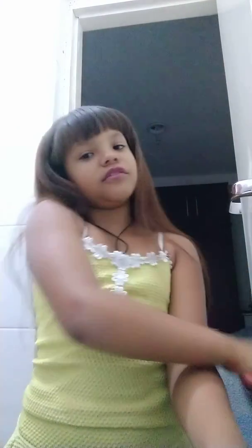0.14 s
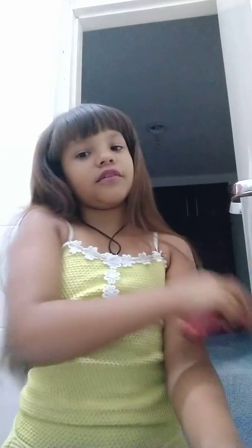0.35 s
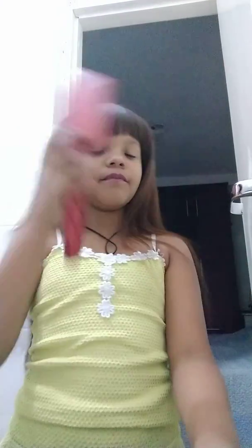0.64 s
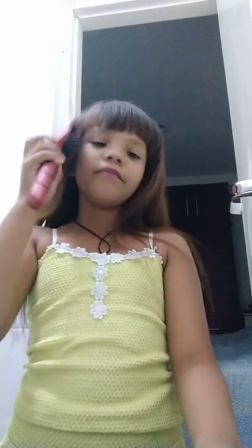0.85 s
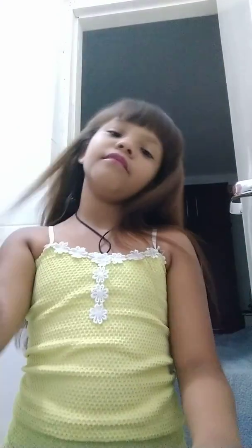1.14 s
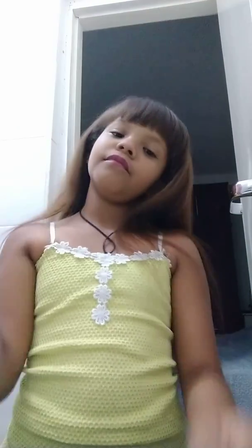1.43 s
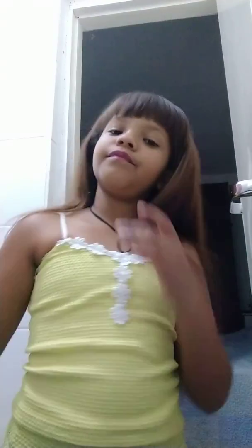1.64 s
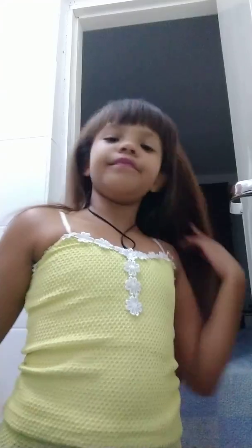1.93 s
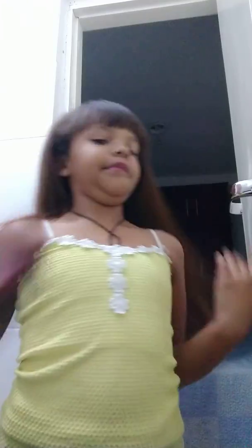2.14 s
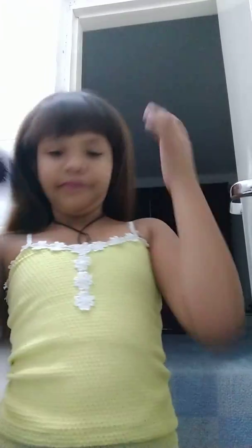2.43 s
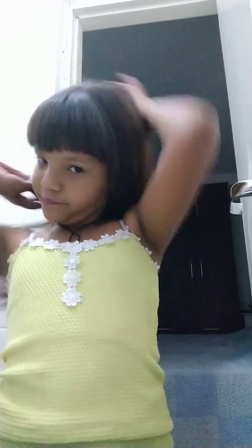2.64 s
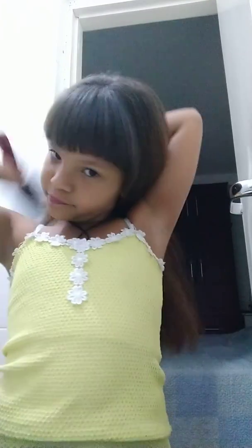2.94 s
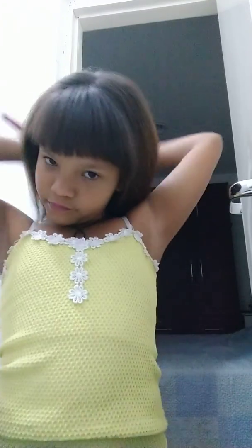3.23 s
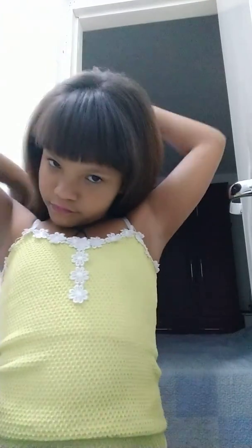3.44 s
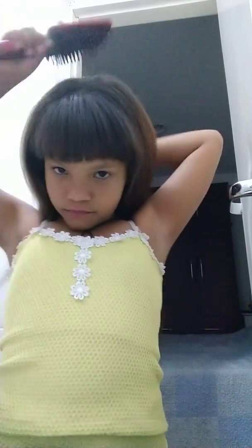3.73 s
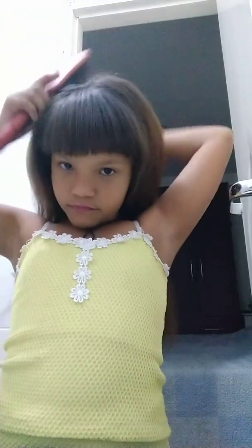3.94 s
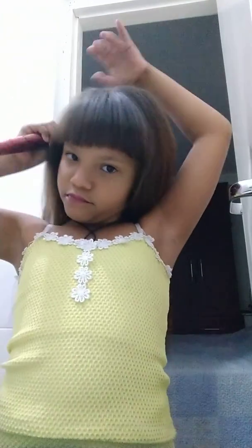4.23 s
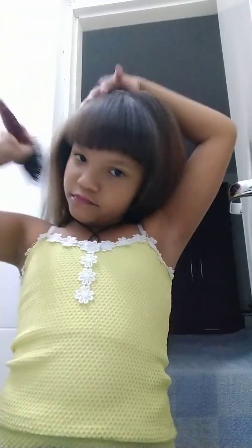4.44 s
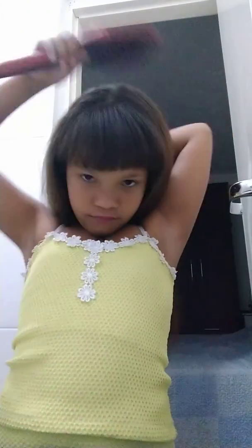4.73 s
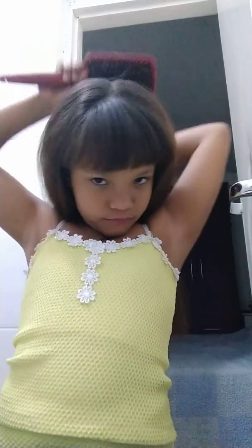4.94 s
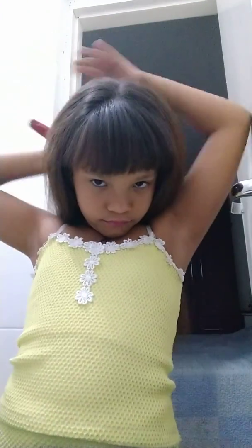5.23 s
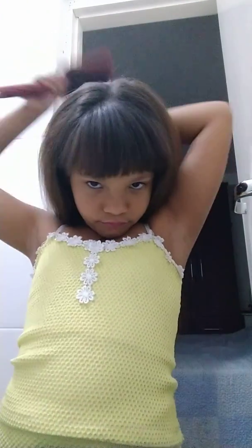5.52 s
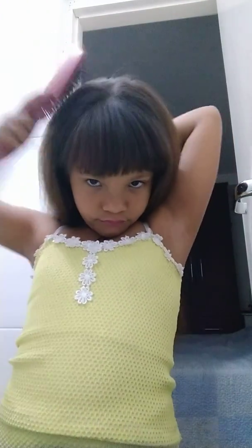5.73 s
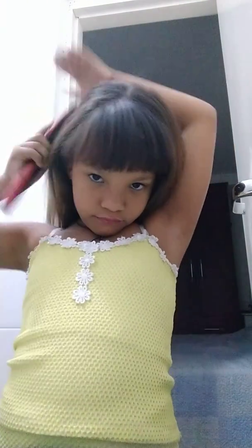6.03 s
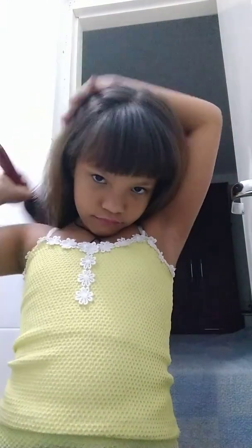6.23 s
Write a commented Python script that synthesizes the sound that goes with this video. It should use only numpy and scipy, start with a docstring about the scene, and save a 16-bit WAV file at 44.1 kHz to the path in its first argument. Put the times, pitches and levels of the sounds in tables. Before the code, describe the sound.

Close stereo microphones in a small tiled room with a quiet low murmur and slight hiss. At about 0.1 s there is a faint tick and soft bump; at 0.24 s a hard knock with a click, and at 0.58 s a much louder, cracking knock that clips, rings woodenly and leaves the level ducked. A tiny high squeak at 0.86 s precedes brush strokes at 1.1 to 1.2 s, swishy and scratchy, then fainter sliding hair and a tick around 1.5 to 1.6 s. Strokes grow from 2.4 to 2.8 s. Small snags lead to a heavy thud at 3.47 s, starting a deep, hollow, ringing drumming with strong swishes to 3.8 s, fading over about a second. Ticks and strokes follow at 3.9 to 4.4 s. At 5.0 s thin squeaks, at 5.25 s a firm stroke with a low thump, then soft fading rustle to 6.3 s.

```python
"""A quiet room murmur comes first, with a faint tick and a soft bump, then two hard knocks of a hairbrush.
Long hair is brushed in a small tiled room, close to a pair of microphone ports; the second knock
overloads the recorder and ducks its gain. Pins tick (short noise bursts), pluck the hair and drum on the
hollow cushion, while strands swish and hiss (filtered random clicks, densest in the hiss); pulls swell and fade.
Midway a deep, ringing drumming (narrow resonances) sets in at once and dies away over a second."""
import sys
import numpy as np
from scipy import signal
from scipy.fft import rfft, irfft, next_fast_len
from scipy.io import wavfile
from scipy.ndimage import uniform_filter1d

SR = 44100
rng = np.random.default_rng(int(sys.argv[2]) if len(sys.argv) > 2 else 0)


def generate_wav(signal):
    """Clip the signal to [-1, 1] and save it as 16-bit WAV at the path in sys.argv[1]."""
    frames = np.transpose(np.atleast_2d(signal))
    scaled = np.clip(frames, -1, 1) * 32767
    pcm = np.round(scaled).astype(np.int16)
    wavfile.write(sys.argv[1], SR, pcm)


N = 280668
TIME = np.arange(N) / SR
SIZE = next_fast_len(N + SR)  # room for a one-second tail
FREQS = np.maximum(np.fft.rfftfreq(SIZE, 1 / SR), 1)
LEFT_RIGHT = np.array([[1], [-1]])


def from_db(db):
    """Decibels to gain."""
    return 10 ** (np.asarray(db) / 20)


def rms_one(x):
    """Scale to an rms of 1."""
    return x / np.sqrt(np.mean(x ** 2) + 1e-20)


def at_hz(points, hz):
    """Read a table between its points, on a log-frequency axis."""
    knots, values = np.transpose(points)
    return np.interp(np.log(hz), np.log(knots), values)


def colour(x, spectrum):
    """Filter to a spectrum without sounding ahead of the input; white noise keeps its power."""
    gain = rms_one(from_db(at_hz(spectrum, FREQS)))
    cepstrum = irfft(np.log(gain), SIZE)
    # folding the cepstrum forward in time makes the filter minimum-phase
    cepstrum[1:SIZE // 2] *= 2
    cepstrum[SIZE // 2 + 1:] = 0
    return irfft(rfft(x, SIZE) * np.exp(rfft(cepstrum)), SIZE)[..., :N]


def low_cut(x, hz):
    """Remove what lies below a frequency."""
    return signal.sosfilt(signal.butter(2, hz, "high", fs=SR, output="sos"), x)


def drift(rate_hz):
    """Slow random wandering with spread 1, computed at every 40th sample."""
    r = np.exp(-80 * np.pi * rate_hz / SR)
    noise = rng.standard_normal(N // 40 + 2002)
    slow = signal.lfilter([1], [1, -2 * r, r * r], noise)[2000:]  # drop the settling time
    return np.interp(np.arange(N) / 40, np.arange(len(slow)), rms_one(slow))


def grains(per_s, spread_db):
    """Two trains of random clicks of uneven size and sign; rms 1."""
    sizes = from_db(spread_db * np.minimum(rng.exponential(1, (2, N)), 4))
    signed = sizes * rng.choice([-1, 1], (2, N))
    return rms_one(signed * (rng.random((2, N)) < per_s / SR))


def impulses(times, db):
    """One click per event."""
    out = np.zeros(N)
    out[np.round(np.asarray(times) * SR).astype(int)] = from_db(db)
    return out


def fade(start, length):
    """Sudden start, then exponential decay."""
    age = TIME - start
    return (age >= 0) * np.exp(-np.clip(age / length, 0, 60))


def swell(s, rise, hold, fall, swell_db=20):
    """Gain of one movement: it climbs 20 dB over its rise, holds around its middle, sinks 20 dB over its fall."""
    age = TIME - s
    outside_hold = np.maximum(abs(age) - hold / 2, 0)
    return from_db(-swell_db * outside_hold / np.where(age < 0, rise, fall))


def even(x, window_s):
    """Hold the level of a noise steady over the window; its faster flutter stays."""
    power = uniform_filter1d(np.mean(x ** 2, axis=0), size=max(int(window_s * SR), 1))
    return x / np.sqrt(np.maximum(power, 1e-12))


def ring(clicks, hz, t60):
    """A unit click sets a sine of height 1 ringing; it falls 60 dB in t60 seconds."""
    r, w = np.exp(-np.log(1000) / (t60 * SR)), 2 * np.pi * hz / SR
    return signal.lfilter([0, np.sin(w)], [1, -2 * r * np.cos(w), r * r], clicks + 1e-18)


def resonances(x, table):
    """Parallel resonances, each at its own level; the narrower, the longer it rings."""
    out = []
    for hz, width_hz, db in table:
        t60 = np.log(1000) / (np.pi * abs(width_hz))
        out.append(from_db(db) * rms_one(ring(x, hz, t60)))
    return out


# resonances of the brush and the room around it: pitch_hz, width_hz, boost_db
BRUSH_BODY = [(119, 390, 2.5), (191.3, 13, 7.5), (248, 31, 5.5), (315.6, 3.2, 11.5), (416, 26, 7),
              (585, 100, -6.5), (604.2, 16, 12.5), (660, 57, 1), (975, 14, 6.5)]


def body(x):
    """A chain of resonant peaks and dips."""
    for hz, width_hz, db in BRUSH_BODY:
        gain, half = from_db(db / 2), np.pi * width_hz / SR
        c = -2 * np.cos(2 * np.pi * hz / SR)
        x = signal.lfilter([1 + half * gain, c, 1 - half * gain],
                           [1 + half / gain, c, 1 - half / gain], x)
    return x


# how long the room takes to fall silent by 60 dB: pitch_hz, t60_s
ROOM_DECAY = [(80, 0.65), (170, 0.66), (400, 0.55), (800, 0.36), (1500, 0.29), (14000, 0.22)]


def room(x):
    """Diffuse one-second tail, two unrelated draws; each band of noise dies at its own rate."""
    edges = np.r_[0, 60 * 2 ** np.arange(9), SR]
    white, hz, tail = rfft(rng.standard_normal((2, SR))), np.arange(SR // 2 + 1), 0
    for low, high in zip(edges, edges[1:]):
        band = irfft(white * ((hz >= low) & (hz < high)), SR)
        t60 = at_hz(ROOM_DECAY, (low + high) / 2)
        tail = tail + band * np.exp(-np.log(1000) * TIME[:SR] / t60)
    return signal.fftconvolve(np.atleast_2d(x), tail, axes=1)[:, :N]


# how alike the two ports hear: pitch_hz, likeness (1 same, 0 unrelated, -1 opposite)
PORT_LIKENESS = [(60, -0.15), (130, 0.7), (300, 0.78), (700, 0.9), (1300, 0.93), (1800, -0.56), (2150, -1),
                 (2700, -0.1), (3200, 1), (3800, 0.03), (4400, -0.81), (5300, 0.86), (6200, -0.21),
                 (15000, 0)]
# which port is louder: pitch_hz, left_minus_right_db
PORT_BALANCE = [(60, 13.5), (120, 5.5), (300, 1.5), (1000, 0.5), (2400, -1), (15000, -2.5)]


def ports(pair):
    """Mix two unrelated signals into left and right, alike or opposed according to pitch."""
    mid, side = rfft(pair, SIZE)
    alike = np.clip(at_hz(PORT_LIKENESS, FREQS), -.99, .99)
    both = np.sqrt((1 + alike) / 2) * mid + LEFT_RIGHT * np.sqrt((1 - alike) / 2) * side
    balance = from_db(LEFT_RIGHT * at_hz(PORT_BALANCE, FREQS) / 2)
    return irfft(both * balance, SIZE)[:, :N]


# tone of the quiet room, relative: pitch_hz, level_db per Hz
BACKGROUND_COLOUR = [(25, 3), (55, -25), (90, -2), (125, 7.5), (200, -10.5), (330, 1.5), (480, -28),
                     (650, -10), (1000, -13.5), (2000, -36.5), (3500, -35.5), (8000, -25), (16000, -28.5)]


def background():
    """Steady murmur of the room's air, with a little hiss: filtered noise."""
    murmur = body(colour(rng.standard_normal((2, N)), BACKGROUND_COLOUR))
    return from_db(-53.0) * rms_one(murmur)


# pulls of the brush through the hair: middle_s, rise_s, hold_s, fall_s, cushion_drumming_db,
# swish_db, strand_hiss_db, rasp_db, swish_pitch as a ratio
HAIR_PULLS = [(0.45, 0.4, 0.016, 0.38, -70, -50.5, -60, -61, 1.03),
              (1.125, 0.16, 0.068, 0.13, -46, -39, -55, -54.5, 1.04),
              (1.228, 0.1, 0.03, 0.12, -45.5, -41.5, -60, -76, 0.88),
              (1.615, 0.14, 0.084, 0.13, -76, -53, -57, -52.5, 1.1),
              (2.1, 0.1, 0.11, 0.21, -59.5, -58, -63, -65, 1.1),
              (2.43, 0.27, 0.044, 0.17, -65, -53.5, -61.5, -79, 0.98),
              (2.595, 0.092, 0.036, 0.19, -50.5, -46, -53, -56, 1.06),
              (2.797, 0.091, 0.038, 0.14, -41.5, -32.5, -51, -53, 0.98),
              (3.03, 0.23, 0.18, 0.2, -74, -64, -64.5, -86, 0.92),
              (3.29, 0.15, 0.023, 0.58, -41.5, -45.5, -58.5, -56, 0.95),
              (3.39, 0.082, 0.022, 0.24, -47, -37.5, -59, -53.5, 0.99),
              (3.61, 0.051, 0.017, 0.21, -26.5, -29, -61, -48, 0.98),
              (3.83, 0.15, 0.021, 0.31, -31, -34.5, -83, -47, 1.0),
              (4.14, 0.6, 0.12, 0.47, -43, -46.5, -53, -54, 0.99),
              (4.43, 0.05, 0.031, 0.11, -38.5, -39.5, -52.5, -59, 1.04),
              (5.17, 0.52, 0.04, 0.27, -47.5, -48, -51.5, -51.5, 1.02),
              (5.25, 0.15, 0.033, 0.21, -37, -36, -65, -47.5, 0.98),
              (5.92, 0.64, 0.024, 0.73, -54, -52.5, -60, -60.5, 1.02),
              (6.18, 0.16, 0.13, 0.1, -49.5, -49.5, -62.5, -62.5, 0.89)]
# between pulls the hair keeps stirring, and its level wavers
IDLE_CUSHION_DB, IDLE_SWISH_DB, IDLE_HISS_DB, IDLE_RASP_DB, IDLE_WAVER_DB = -62.5, -68, -67.5, -72.5, 3.2


def swells(levels_db, idle_db, stretch=1, lead=0):
    """Gain of one layer: the pulls add in power over the idle stirring."""
    power = from_db(idle_db + IDLE_WAVER_DB * drift(3.4)) ** 2
    for (s, rise, hold, fall, *_), db in zip(HAIR_PULLS, levels_db):
        pull = from_db(db) * swell(s - lead, rise * stretch, hold, fall * stretch)
        power = power + pull ** 2
    return np.sqrt(power)


def glide(pair, ratios):
    """Shift a noise's pitch from pull to pull by reading it faster or slower, round and round."""
    place = np.cumsum(np.interp(TIME, np.transpose(HAIR_PULLS)[0], ratios))
    return np.array([np.interp(place % N, np.arange(N), x) for x in pair])


# tones of the hollow cushion, the moving hair, the fine strands and the coarse strands,
# all relative: pitch_hz, level_db per Hz
CUSHION_COLOUR = [(30, -28.5), (123, -9.5), (186, -6.5), (307, -0.5), (443, -3), (508, -18), (624, -0.5),
                  (878, -14), (984, -10), (1150, -23.5), (2090, -28), (3080, -40.5), (7000, -45.5),
                  (10000, -96.5)]
SWISH_COLOUR = [(60, -39), (150, -9.5), (260, -33), (420, -4), (690, 5.5), (1000, -9.5), (1400, -21.5),
                (2100, -31), (3000, -39.5), (5000, -55.5)]
HISS_COLOUR = [(400, -22), (900, -0.5), (1400, 5), (3100, 5.5), (5400, 2), (10500, -2), (15000, 1),
               (17000, -5.5)]
RASP_COLOUR = [(400, -42.5), (900, 2.5), (1400, 8.5), (2100, 7.5), (3100, -0.5), (4400, -6.5), (5400, -12),
               (8000, -41.5)]
CUSHION_LINGERS = 1.42  # the cushion swells and dies this many times more slowly than the swish
HISS_LEAD_S = 0.011  # the strands slip just before the hair as a whole moves
# single strands flick off the pins, the louder the harder the pull
FLICKS_PER_S, FLICK_SPREAD_DB, FLICK_DB = 90, 4, -9  # level against the other hiss and rasp grains
DRUM_RASP_DB = -22.5  # rasp during the deep drumming, against its cushion


def brushing():
    """Pins pluck the cushion, moving hair swishes, strands slip past the pins as fine hiss and scratchy rasp."""
    cushion_db, swish_db, hiss_db, rasp_db, pitch = np.transpose(HAIR_PULLS)[4:]
    drum = drumming()

    plucks = body(colour(grains(per_s=3000, spread_db=1.5), CUSHION_COLOUR))
    cushion_gain = swells(cushion_db, IDLE_CUSHION_DB, stretch=CUSHION_LINGERS)
    cushion = even(plucks, window_s=0.06) * np.hypot(cushion_gain, drum)

    hair = glide(colour(grains(per_s=1800, spread_db=2.5), SWISH_COLOUR), pitch)
    swish = even(hair, window_s=0.055) * swells(swish_db, IDLE_SWISH_DB)

    flicks = from_db(FLICK_DB) * grains(FLICKS_PER_S, FLICK_SPREAD_DB)
    fine = rms_one(grains(per_s=7000, spread_db=0.7) + flicks)
    hiss = colour(fine, HISS_COLOUR) * swells(hiss_db, IDLE_HISS_DB, lead=HISS_LEAD_S)

    scratch = rms_one(grains(per_s=4000, spread_db=-1.0) + flicks)
    rasp_gain = swells(rasp_db, IDLE_RASP_DB, lead=HISS_LEAD_S)
    rasp = colour(scratch, RASP_COLOUR) * np.hypot(rasp_gain, drum * from_db(DRUM_RASP_DB))

    flutter = from_db(0.96 * drift(30))
    return cushion + swish + (hiss + rasp) * flutter


# pins landing or snapping free: start_s, level_db (before a 6 dB lift), length_s, lowest_hz
PIN_TICKS = [(0.0732, -45, 0.00084, 2780), (0.242, -31.5, 0.0021, 3020), (0.2512, -26, 0.0011, 8000),
             (0.3905, -42, 0.0012, 7450), (1.5076, -37, 0.0016, 2550), (2.044, -53, 0.0029, 6050),
             (3.162, -45.5, 0.018, 610.7), (3.888, -26, 0.0035, 3040), (4.323, -33.5, 0.0011, 3220),
             (4.861, -35.5, 0.008, 1290), (5.357, -43, 0.00079, 6500), (5.824, -40, 0.0052, 1600)]
# tone shared by all ticks, relative: pitch_hz, level_db per Hz
PIN_COLOUR = [(300, -2), (900, 5.5), (3500, 2), (12000, -2)]


def ticks(rise_share=0.45):
    """Pins touch within a few milliseconds: short noise, each cut below its own lowest pitch; the tiles answer."""
    pins, direct = rng.standard_normal((2, N)), 0
    for s, db, length, lowest_hz in PIN_TICKS:
        thinned = low_cut(pins, min(lowest_hz, SR / 3))
        touching = fade(s, length) * (1 - fade(s, length * rise_share))
        direct = direct + thinned * touching * from_db(db + 6.0)
    return colour(direct + from_db(-31.0) * room(direct), PIN_COLOUR)


# bumps of the brush on the head: middle_s, push_db, contact_s (spread of the push),
# mode_hz that it wakes, mode_db, mode_t60_s
HEAD_BUMPS = [(0.093, 1, 0.00044, 249, -41.5, 0.51), (1.512, -26, 0.0001, 862, -35.5, 0.044),
              (3.168, -6, 0.0012, 141, -42.5, 0.84), (3.47, 12.5, 0.0002, 272.8, -19.5, 0.5),
              (3.4755, 34.5, 0.00099, 189.2, -19.5, 0.37), (3.889, 12, 0.0033, 86.3, -33, 0.56),
              (4.405, -6.5, 0.000081, 253.3, -36.5, 0.8), (4.411, -11, 0.0033, 129.3, -37, 1.04),
              (4.86, 6.5, 0.00046, 128.8, -46.5, .8), (5.242, 0.5, 0.00011, 171.2, -26.5, 0.45),
              (5.266, 32, 0.0015, 81.23, -39.5, 1.72)]
# tone of the thuds, relative: pitch_hz, level_db per Hz
THUD_COLOUR = [(30, -49.5), (100, -17), (300, -10.5), (500, -0.5), (700, 10.5), (1100, -0.5), (2500, -8),
               (6000, 1)]
# a close neighbour of each mode makes the boom build up and waver
PARTNER_SHARE, PARTNER_OFFSET_HZ, PARTNER_T60_RATIO = 0.38, 5.7, 0.36


def bumps():
    """A soft push, duller when longer, wakes a pair of close modes; gives direct thud and reverberation."""
    push, boom = 0, 0
    for s, db, contact, hz, boom_db, t60 in HEAD_BUMPS:
        bell = np.exp(-np.clip((TIME - s) / contact, -10, 10) ** 2 / 2)
        push = push + from_db(db) * bell / bell.sum()
        kick = impulses([s], boom_db)
        partner = ring(kick, hz + PARTNER_OFFSET_HZ, t60 * PARTNER_T60_RATIO)
        boom = boom + ring(kick, hz, t60) - PARTNER_SHARE * partner
    thud = body(colour(push, THUD_COLOUR))
    return thud + boom, from_db(-27.5) * room(thud)


# hard knocks: start_s, sharp_slap_db, ringing_modes_db, room_crash_db
HARD_KNOCKS = [(0.2434, -21, -23, -19.5), (0.5784, 3, -16, -15.5)]


def slaps(width_s=0.00019, crack_db=-10, crack_length=.00007, crack_pan_db=-8, left_lag_s=.0001,
          low_cut_hz=260):
    """Direct knocks: the hard shell cracks, nearer the right port, and the pressure swings once."""
    out = 0
    crack_gain = from_db(crack_db + crack_pan_db * LEFT_RIGHT / 2)
    for start, db, *_ in HARD_KNOCKS:
        u = np.clip((TIME - start - left_lag_s * np.array([[1], [0]])) / width_s, -10, 10)
        swing = u * np.exp((1 - u * u) / 2)
        crack_start = round((start - 2 * width_s) * SR) / SR  # on a whole sample
        crack = fade(crack_start, crack_length) * crack_gain
        out = out + from_db(db) * (swing + crack)
    return low_cut(out, low_cut_hz)


# what the knocks ring with: pitch_hz, first_knock_db, second_knock_db (both on top of
# ringing_modes_db), t60_s
KNOCK_RINGS = [(170.5, -4.5, -5.5, 0.7), (240.6, -7.5, -11, 0.73), (257, -6, -16.5, 0.6),
               (281, -16.5, -13, 0.5), (422, -15, -12, 0.6), (479, -21.5, -10, 0.46),
               (600, -5.5, -16.5, 0.84), (616, -2, -16.5, 0.63), (675, -4, -16.5, 0.45),
               (704, -1, -16, 0.43), (737, -14, -6, 0.32), (798, -10.5, -15.5, 0.41),
               (936, -18.5, -20, 0.3), (1068, -17.5, -10.5, 0.36)]
# tone of the room crash, relative: pitch_hz, level_db per Hz
CRASH_COLOUR = [(50, -26.5), (130, -24.5), (200, -2), (450, -8), (700, 2), (1200, -9), (2100, -14.5),
                (3200, -24), (4800, -32.5), (9000, -31.5), (16000, -44)]
# bright bands that the brush's hard shell rings with: pitch_hz, width_hz, level_db
SHELL_BANDS = [(3000, 900, 0), (4920, 300, 6), (9000, 600, -7.5)]


def knocks(echo_delay=.038, echo_db=-19, second_wave_db=-5, snap_db=-92, low_cut_hz=140):
    """A slap, ringing modes and room crash; a wall sends a second wave, the tiles return the shell's snap."""
    s, _, ring_db, crash_db = np.transpose(HARD_KNOCKS)
    slap, rings = slaps(), 0
    echo = from_db(echo_db) * np.interp(TIME - echo_delay, TIME, slap[0])
    for k, (hz, first_db, second_db, t60) in enumerate(KNOCK_RINGS):
        arrival = s + rng.uniform(0, 0.0039)  # each mode comes by a path of its own
        clicks = impulses(arrival, ring_db + [first_db, second_db])
        rings = rings + (-1) ** k * ring(clicks, hz, t60)
    rings = low_cut(rings, low_cut_hz)

    waves = impulses(s, crash_db) + impulses(s + echo_delay, crash_db + second_wave_db)
    crash = colour(room(waves), CRASH_COLOUR)
    sharp_edges = np.diff(slap[1], n=2, prepend=[0, 0])
    snap = sum(resonances(sharp_edges, SHELL_BANDS))
    return slap + echo + rings, crash + from_db(snap_db) * room(snap)


# loose hair slides: middle_s, rise_s, hold_s, fall_s, level_db
HAIR_SLIDES = [(0.437, .02, 0.068, .2, -78), (1.6, 0.21, 0.12, 0.094, -58.5),
               (2.461, 0.19, 0.16, 0.22, -61.5)]
# bright bands of the sliding hair: pitch_hz, width_hz, level_db
SHEEN_BANDS = [(2896, 650, -1.5), (5550, 570, -3), (7160, 900, 0), (9200, 1300, -6.5)]


def slides():
    """Loose lengths of hair slide over the skin: fine grain in a few bright bands."""
    grain = np.diff(grains(per_s=3500, spread_db=-1.0), prepend=0)
    sheen = rms_one(sum(resonances(grain, SHEEN_BANDS)))
    return sheen * sum(from_db(db) * swell(s, rise, hold, fall) for s, rise, hold, fall, db in HAIR_SLIDES)


# a taut strand squeaks on a pin: start_s, length_s, starting_pitch_hz, level_db
STRAND_SQUEAKS = [(0.864, 0.04, 9180, -58), (5.02, 0.049, 8760, -57), (5.025, 0.027, 10600, -52.5)]
SQUEAK_CLIMB_HZ_PER_S, SQUEAK_JITTER_HZ = 9100, 380


def squeaks():
    """Stick and slip of one strand: a thin, unsteady whistle that climbs as the strand tightens."""
    # the jitter takes a new value every 40 samples
    out, jitter = 0, SQUEAK_JITTER_HZ * rng.standard_normal(N // 40 + 1).repeat(40)[:N]
    for s, length, hz, db in STRAND_SQUEAKS:
        age = np.clip(TIME - s, 0, length)
        pitch_hz = hz + SQUEAK_CLIMB_HZ_PER_S * age + jitter
        phase = 2 * np.pi * np.cumsum(pitch_hz) / SR
        out = out + from_db(db) * np.sin(np.pi * age / length) * np.sin(phase)
    return out


# pins slip out of tangles: start_s, level_db (of the click before it is coloured)
TANGLE_SNAGS = [(1.069, -20), (1.142, -11), (1.239, -20), (2.169, -23.5), (3.349, -16), (3.383, -11),
                (3.55, -2.5), (3.578, -1)]


def snags(room_db=-33):
    """A pin leaves a tangle with one pluck, coloured like the swish; gives pluck and reverberation."""
    pluck = colour(impulses(*np.transpose(TANGLE_SNAGS)), SWISH_COLOUR)
    return pluck, from_db(room_db) * room(pluck)


# one deep drumming sets in at once, holds and dies away slowly
DRUM_START_S, DRUM_ATTACK_S, DRUM_HOLD_S = 3.462, 0.0089, 0.19  # the hold counts from the start
DRUM_DB, DRUM_FALL_DB_PER_S = -26, 31


def drumming():
    """Gain of the deep drumming: attack, hold, long release."""
    age = TIME - DRUM_START_S
    attack = np.clip(age / DRUM_ATTACK_S, 0, 1)
    return attack * from_db(DRUM_DB - DRUM_FALL_DB_PER_S * np.maximum(age - DRUM_HOLD_S, 0))


# what the deep drumming rings with: pitch_hz, width_hz, level_db
DRUM_RESONANCES = [(192.8, 3.2, -7), (212.8, 10, -10.5), (272.8, 4.6, -1), (310.3, 5.3, -2),
                   (358.6, 4.6, -18), (434.6, 5.9, -9.5), (612, 3.8, -10), (660, 3, -25), (787, 9.3, -16.5),
                   (952, 4.7, -10.5)]
DRUM_RING_DB = -1  # the ringing against the drumming itself
DRUM_TOP_HZ = 1120  # the ringing is dull above this
DRUM_LEFT_LAG_S, DRUM_PAN_DB = 0.00023, 2  # the ringing comes from one place


def drum_rings(window_s=0.18):
    """Dense plucks with little deep bass keep narrow resonances ringing, a little later on the left."""
    plucks = np.diff(grains(per_s=3600, spread_db=-1.0)[:1], prepend=0)
    # each resonance is held even, at its own level
    rings = sum(np.std(x) * even(x, window_s) for x in resonances(plucks, DRUM_RESONANCES))[0]
    dulled = signal.sosfilt(signal.butter(2, DRUM_TOP_HZ, fs=SR, output="sos"), rings)
    rings = dulled * drumming() * from_db(DRUM_RING_DB)
    left = np.interp(TIME - DRUM_LEFT_LAG_S, TIME, rings)
    return np.array([left, rings]) * from_db(DRUM_PAN_DB * LEFT_RIGHT / 2)


def scene():
    """Knocks, thuds, plucks, squeaks and ringing arrive directly; all else arrives from many sides."""
    knock, crash = knocks()
    thud, rumble = bumps()
    pluck, pluck_tail = snags()
    direct = knock + pluck + squeaks() + drum_rings() + thud * from_db(1.5 * LEFT_RIGHT)
    diffuse = crash + rumble + pluck_tail + brushing() + slides() + ticks() + background()
    return direct + ports(diffuse)


def record(dry, threshold_db=-8.5, release_db_per_s=9, attack_s=0.0055):
    """Deep bass is shed, gain ducks after loud peaks and recovers slowly, peaks clip, the top is cut."""
    sound = low_cut(dry, 55)
    peak_db = 20 * np.log10(np.abs(sound).max(axis=0) + 1e-9)
    over = np.maximum(peak_db - threshold_db, 0)
    # hold each excess, letting it sink at the release rate
    held = np.maximum.accumulate(over + release_db_per_s * TIME) - release_db_per_s * TIME
    r = np.exp(-1 / (attack_s * SR))
    duck_db = signal.lfilter([1 - r], [1, -r], held)
    clipped = np.clip(sound * from_db(-duck_db), -1, 1)
    return signal.sosfilt(signal.ellip(10, .1, 70, 15800, fs=SR, output="sos"), clipped)


dry = scene()
out = record(dry)
generate_wav(out)
```